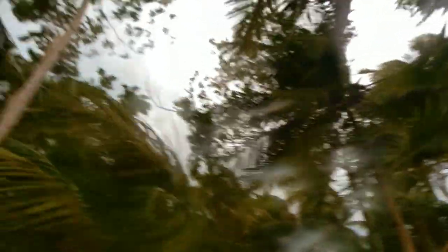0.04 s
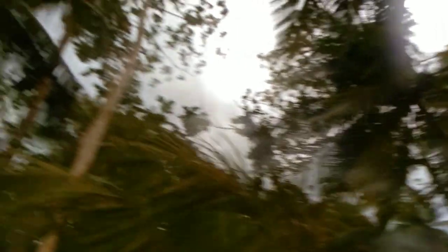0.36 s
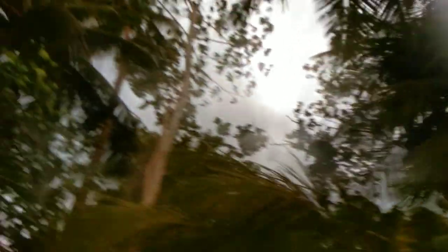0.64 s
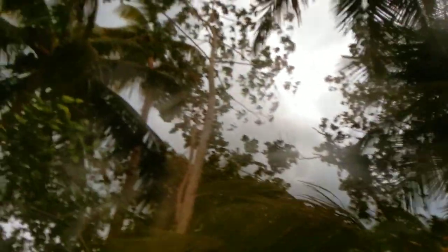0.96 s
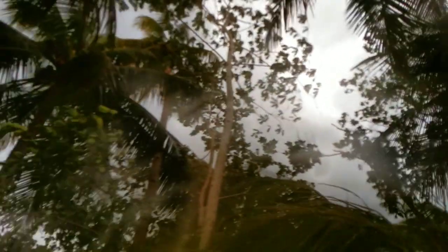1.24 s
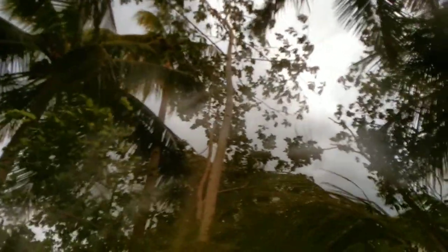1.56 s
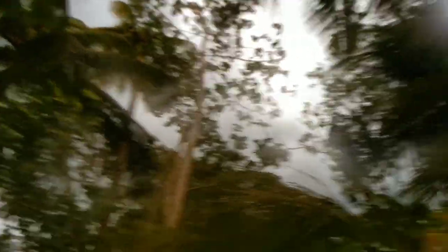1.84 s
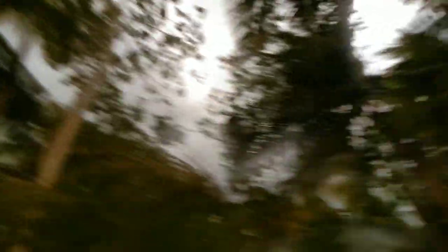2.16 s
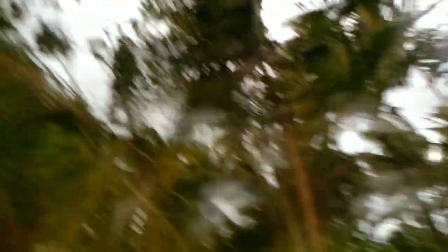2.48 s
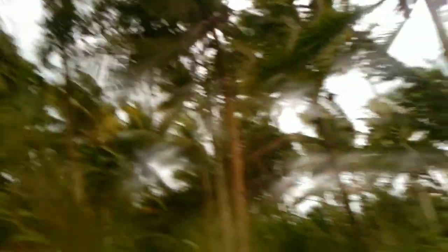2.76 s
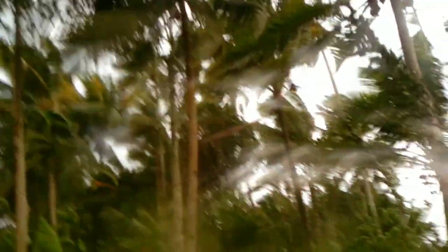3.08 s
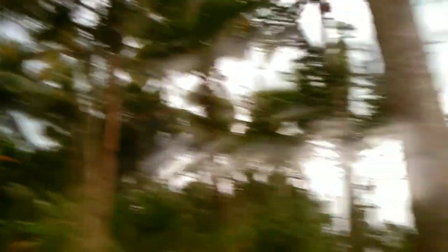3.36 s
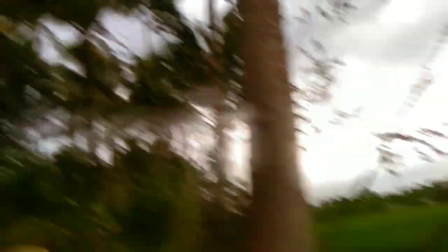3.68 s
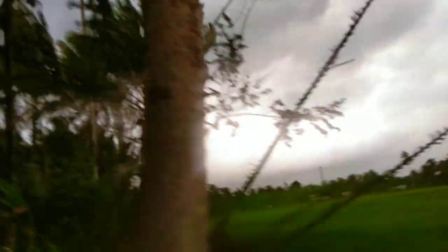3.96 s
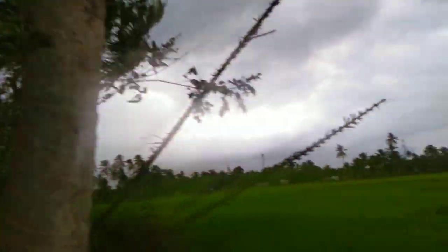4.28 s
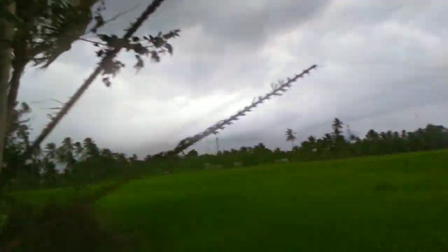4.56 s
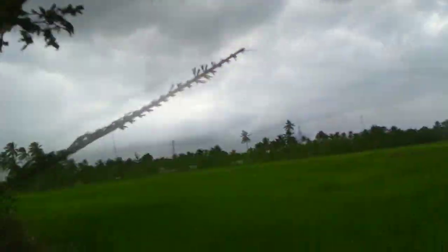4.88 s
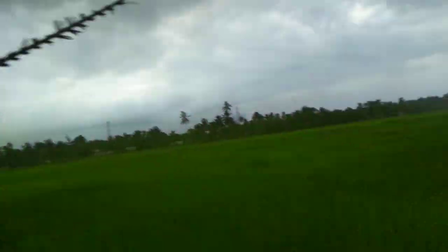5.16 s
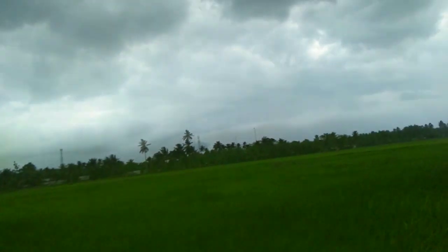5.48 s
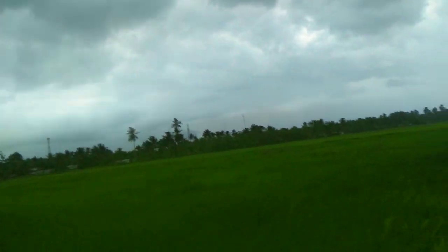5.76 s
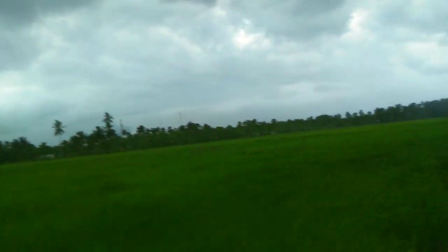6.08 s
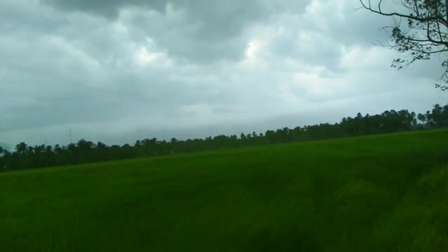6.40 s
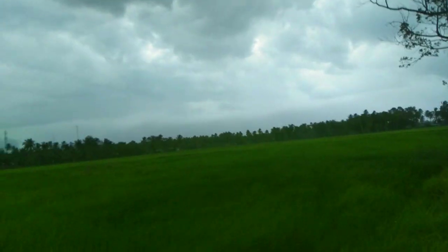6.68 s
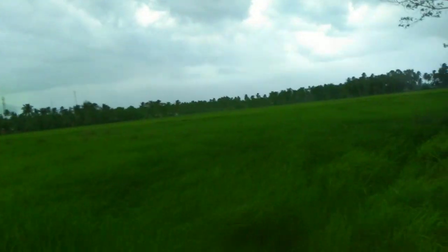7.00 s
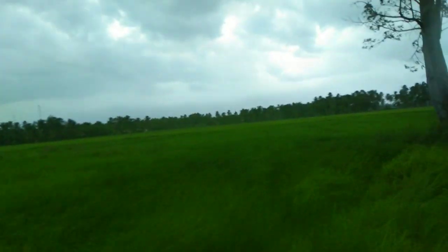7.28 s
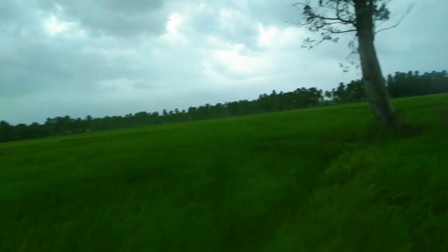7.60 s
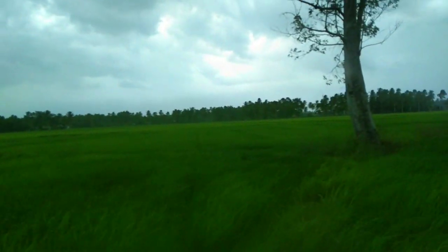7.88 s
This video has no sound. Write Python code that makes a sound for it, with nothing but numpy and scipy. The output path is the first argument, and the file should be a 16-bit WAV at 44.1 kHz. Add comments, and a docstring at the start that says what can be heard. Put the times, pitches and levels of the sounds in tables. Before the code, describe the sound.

Storm wind hits the microphone from the start with a low, lumpy rumble, over the steady hiss and fine patter of palms and trees beside an open field. The gusts are hard and uneven through the first three seconds, with dull thumps, and the leaf hiss dips slightly under the strongest ones. A dull rush swells beneath the wind around 1.5 seconds and dies away after 5. Faint cracks come at about 0.6 and 2.4 seconds, and a short, close snap, like a twig, at 4 seconds. Two thin, faint ticks sit on gusts near 3.8 and 6.3 seconds. The buffeting weakens from about 5 to 6.2 seconds, leaving mostly the leaves. Then deep gusts and thumps return, strong around 6.5 and 7.4 seconds, and continue to the end near 8 seconds as the hiss softens a little.

```python
"""A lumpy rumble of storm wind comes first, over the hiss of palms and trees beside an open field.
Turbulent gusts press on the port of a single microphone, and lone eddies thump against it.
Countless leaf impacts add up to a patter and hiss; a dull rush under the wind dies away after 5 s.
There are faint cracks, a close snap near 4 s, likely a twig, and two thin ticks at gust peaks.
In hard gusts the recorder's limiter turns everything down, so the leaves duck."""
import sys
import numpy as np
from scipy import signal
from scipy.fft import rfft, irfft, next_fast_len
from scipy.io import wavfile
from scipy.ndimage import uniform_filter1d

SR = 44100
rng = np.random.default_rng(int(sys.argv[2]) if len(sys.argv) > 2 else 0)


def digitize_waveform(pressure):
    """Quantize a signal to 16-bit integers and store it at the path in sys.argv[1].

    Rows of a 2-D input are taken as channels; values are limited to [-1, 1].
    """
    field = np.atleast_2d(pressure).T
    bounded = np.clip(field, -1, 1)
    quanta = np.round(bounded * 32767).astype(np.int16)
    wavfile.write(sys.argv[1], SR, quanta)


N = 350154

# flow at the port between gusts: (time [s], force [dB])
BREEZE_FORCE = [(0.0, -38), (1.0, -35), (2.0, -36.5), (3.0, -37.5), (3.45, -41), (4.35, -50.5), (4.9, -42),
                (5.35, -49), (5.7, -41.5), (5.84, -59), (6.08, -55), (6.18, -64), (6.4, -34), (7.02, -50),
                (7.3, -34.5), (7.94, -40.3)]
# gusts at the port: (start [s], hold [s], force [dB], extra weight in the big eddies [dB])
PORT_GUSTS = [(0.008, 0.067, -26, 1), (0.132, 0.054, -27.5, 0), (0.181, 0.26, -18, -2.3),
              (0.488, 0.091, -25, 3.7), (0.662, 0.097, -30, 4), (0.886, 0.027, -27, -0.5),
              (1.087, 0.4, -25, -5), (1.531, 0.093, -20.5, -5.5), (1.654, 0.11, -23.5, -13),
              (1.83, 0.17, -32.5, 2), (2.045, 0.18, -26, 0.3), (2.234, 0.26, -21.5, -2),
              (2.51, 0.1, -18.1, -9), (2.623, 0.36, -29.3, 8.5), (3.005, 0.33, -37.5, 6.6),
              (3.665, 0.11, -27.2, -2), (3.836, 0.0093, -22.5, -14), (3.91, 0.092, -30.5, -4),
              (4.055, 0.17, -28.5, -2.8), (4.399, 0.019, -36.5, 0.5), (4.509, 0.042, -35.0, -3),
              (4.613, 0.043, -28.5, -4.5), (4.736, 0.16, -29.5, -2.3), (4.933, 0.118, -42, 2.5),
              (5.124, 0.071, -47.3, 6), (5.196, 0.008, -38.5, 5.1), (5.552, 0.033, -29, 1.5),
              (5.893, 0.029, -43.5, 8.5), (5.972, 0.064, -45.5, 8), (6.267, 0.0094, -34, -5.9),
              (6.328, 0.12, -30.5, 4.5), (6.482, 0.12, -26.5, 5.7), (6.658, 0.018, -26.9, 5.5),
              (6.75, 0.067, -37.5, 4.5), (7.099, 0.0049, -33.5, -10), (7.242, 0.047, -31.5, -2.4),
              (7.321, 0.38, -24.5, -0.7), (7.458, 0.15, -25.5, -21), (7.729, 0.2, -25.1, -8.5)]
# spectrum of the turbulence: (frequency [Hz], relative density [dB])
RUMBLE_SPECTRUM = [(15, -50), (25, -33), (32, -30), (45, -16.5), (60, -5.5), (80, -2), (115, 0),
                   (170, -2.5), (250, -6), (400, -13), (560, -19.5), (1000, -29), (1500, -33), (2000, -59)]
# how strongly a band follows the small eddies rather than the big: (frequency [Hz], weight [ratio])
SMALL_EDDY_WEIGHT = [(105, 0.03), (150, 0.51), (210, 0.87), (300, 0.95), (430, 1.35), (1300, 0.66)]
# steep upper edge of the rumble, highest in hard gusts: (force [dB], edge frequency [Hz])
RUMBLE_EDGE = [(-64, 630), (-42, 480), (-31, 444), (-23.5, 960), (-14.5, 1680)]
# near foliage, swelling and easing slowly: (time [s], relative level [dB])
FOLIAGE_LEVEL = [(0, -30), (0.65, -31), (1.5, -33.5), (2.7, -32), (4.1, -32), (5.5, -33.7), (7, -34),
                 (7.94, -35.8)]
# spectrum of the leaf hiss: (frequency [Hz], relative density [dB])
HISS_SPECTRUM = [(1000, -38), (1500, -24.5), (2400, -13.5), (3100, -6), (3900, -0.5), (4450, 1.5),
                 (5100, -3.5), (6000, -1), (7000, 0.55), (7900, -2), (9500, -9.5), (11000, -15.5),
                 (13000, -22), (15500, -29)]
# rush of the crowns: (time [s], level relative to the foliage [dB])
CROWN_LEVEL = [(0, -13.5), (1.0, -11), (2.0, -11.5), (3.0, -13), (4.0, -14), (7.9, -11.5)]
# spectrum of that rush: (frequency [Hz], relative density [dB])
CROWN_SPECTRUM = [(600, -43), (1050, -45), (1230, -7.5), (1400, -3), (1700, 0.5), (2100, 1), (2900, 1.5),
                  (3500, 0), (4800, -24.5)]
# dull low-mid rush under the wind, dying away after about 5 s: (time [s], level [dB])
DULL_RUSH_LEVEL = [(0, -51), (1.4, -38.5), (3.2, -51), (4.7, -52.5), (5.3, -65.5), (5.8, -73), (7.0, -70),
                   (7.94, -62)]
# spectrum of the dull rush: (frequency [Hz], relative density [dB])
DULL_RUSH_SPECTRUM = [(100, -19), (300, -9), (520, 4.5), (750, -4.5), (950, -1), (1140, -7.5), (1500, -7),
                      (2500, -32)]
# single eddies that hit the port: (time [s], relative level [dB], frequency [Hz])
LONE_EDDIES = [(0.321, -8, 490), (0.434, -10, 460), (2.055, -8, 524), (2.326, -8, 597), (3.707, -12, 434),
               (3.848, -11, 265), (4.655, -16, 262), (4.753, -10, 290), (5.196, -22, 130),
               (5.579, -20, 170), (6.002, -15, 86), (6.340, -14.5, 363), (6.356, -4, 212),
               (6.487, -11.5, 390), (6.811, -7.5, 137), (7.105, -10.5, 123.5), (7.246, -15.5, 325),
               (7.351, -4, 230), (7.407, -4, 273), (7.452, -16, 600), (7.607, -10, 540)]
# faint cracks and a snap, plus thin high ticks like microphone overload at 3.835 and 6.335 s:
# (time [s], relative level [dB], 60 dB decay time [s], tilt [dB/octave])
CRACKS_AND_TICKS = [(0.6155, -21, 0.018, 0), (2.4059, -26, .014, -4), (3.835, -32, .008, 20),
                    (4.0032, -17.5, 0.019, -11), (4.0152, -5, 0.0044, -2), (4.0162, -17, 0.0031, -7.5),
                    (4.018, -23, 0.023, -16), (4.0212, -16.5, 0.0064, -5), (4.0230, -9, 0.0075, -5),
                    (4.0272, -15, 0.019, -1), (6.335, -38, .005, 20)]
# spectrum of a crack or tick before its tilt: (frequency [Hz], relative density [dB])
BURST_SPECTRUM = [(100, -75), (1200, -34), (2400, -18), (3600, -0.5), (6500, 8), (8000, 6), (10000, -33),
                  (11500, -7), (14000, -10), (15500, -15), (17000, -60)]


def from_db(db):
    """Amplitude grows tenfold for every 20 dB."""
    return 10 ** (np.asarray(db) / 20)


def unit_rms(x):
    """Dividing by the rms value gives a signal unit power."""
    return x / np.sqrt(np.mean(x ** 2) + 1e-20)


def in_time(curve):
    """Linear interpolation gives a curve a value at every sample."""
    return np.interp(np.arange(N) / SR, *np.transpose(curve))


def at_hz(points, hz):
    """Interpolation in log frequency treats all octaves alike."""
    frequencies, values = np.transpose(points)
    return np.interp(np.log(np.maximum(hz, 1)), np.log(frequencies), values)


def coloured(x, spectrum):
    """Filtering is multiplication in the frequency domain."""
    size = next_fast_len(len(x))
    hz = np.arange(size // 2 + 1) * SR / size
    return irfft(rfft(x, size) * from_db(at_hz(spectrum, hz)), size)[:len(x)]


def drift(corner_hz):
    """Low-passed noise wanders slowly, here with an rms value of 1."""
    step, settle = 40, 2000
    pole = np.exp(-2 * np.pi * corner_hz * step / SR)
    noise = rng.standard_normal(N // step + settle + 2)
    slow = signal.lfilter([1], [1, -2 * pole, pole * pole], noise)[settle:]
    return np.interp(np.arange(N) / step, np.arange(len(slow)), unit_rms(slow))


def envelope(x, span_s):
    """The root of the locally averaged power traces a signal's amplitude."""
    size = max(int(span_s * SR), 2)
    return np.sqrt(np.abs(uniform_filter1d(uniform_filter1d(x * x, size), size)) + 1e-20)


def wind_force_db(peaks_db, rise_db_per_s=750, fall_db_per_s=317):
    """Gusts add to the breeze in power; each arrives fast, holds and ebbs more slowly."""
    t = np.arange(N) / SR
    power = from_db(in_time(BREEZE_FORCE)) ** 2
    for (start, hold, *_), peak_db in zip(PORT_GUSTS, peaks_db):
        near = np.abs(t - start) < hold + .5
        early = np.maximum(start - t[near], 0)
        late = np.maximum(t[near] - start - hold, 0)
        power[near] += from_db(peak_db - rise_db_per_s * early - fall_db_per_s * late) ** 2
    return 10 * np.log10(power)


def buffeting(full_gust_db, surge_db, lump_db, burst_db, fall_db_per_octave, gain_db):
    """Turbulent pressure on the port: big eddies rumble, hard gusts add smaller, higher-pitched ones."""
    _, _, force_db, weight_db = np.transpose(PORT_GUSTS)
    swing_db = wind_force_db(force_db + weight_db) + 31.5   # about a reference force of -31.5 dB
    big_db = -21.5 + 0.73 * swing_db + surge_db * drift(16)   # big eddies follow only part of the swing
    small_db = wind_force_db(force_db) + burst_db * drift(34.6)
    size = next_fast_len(N)
    hz = np.arange(size // 2 + 1) * SR / size
    flow = rfft(unit_rms(coloured(rng.standard_normal(N), RUMBLE_SPECTRUM)), size)
    centres_hz = np.geomspace(90, 1800, 14)
    band_gains = [at_hz(np.c_[centres_hz, one_band], hz) for one_band in np.eye(len(centres_hz))]
    bands = np.array([irfft(flow * gain, size)[:N] for gain in band_gains])
    tilt_db = np.outer(at_hz(SMALL_EDDY_WEIGHT, centres_hz), small_db - big_db - full_gust_db)
    # the rumble has a steep upper edge, higher in hard gusts and lower in lulls
    edge_hz = np.interp(small_db, *np.transpose(RUMBLE_EDGE))
    octaves_over = np.maximum(np.log2(centres_hz[:, None] / edge_hz), 0)
    shaped = bands * from_db(tilt_db - fall_db_per_octave * octaves_over)
    rumble = np.zeros(N)
    for group in (centres_hz < 250, centres_hz >= 250):
        eddies = bands[group].sum(axis=0)   # each size of eddy carries a steady share of the flow
        rumble += shaped[group].sum(axis=0) * eddies.std() / envelope(eddies, span_s=0.044)
    return rumble * from_db(big_db + gain_db + lump_db * drift(27.6))


def foliage(taps_per_s, spread_db, taps_db, flutter_db, hiss_db):
    """Random impacts make shot noise: near leaves tap, far ones merge into a fluttering hiss and rush."""
    leaf_db = in_time(FOLIAGE_LEVEL)
    touches = rng.random(N) < taps_per_s * from_db(leaf_db - leaf_db.mean()) / SR
    signs = rng.choice([-1, 1], N)
    strengths = from_db(spread_db * np.minimum(rng.exponential(1, N), 4))
    taps = from_db(taps_db) * unit_rms(touches * signs * strengths)
    hiss = from_db(hiss_db) * unit_rms(coloured(rng.standard_normal(N) + taps, HISS_SPECTRUM))
    rush = from_db(in_time(CROWN_LEVEL)) * unit_rms(coloured(rng.standard_normal(N), CROWN_SPECTRUM))
    return from_db(leaf_db + flutter_db * drift(25)) * (hiss + rush)


def dull_rush():
    """Band-limited noise under a slow envelope: a low-mid rush that swells, then dies away."""
    noise = unit_rms(coloured(rng.standard_normal(N), DULL_RUSH_SPECTRUM))
    return from_db(in_time(DULL_RUSH_LEVEL)) * noise


def eddy_thumps(width_cycles, gain_db):
    """A lone eddy is a pressure pulse that pushes and pulls on the port for a cycle or two."""
    t, out = np.arange(N) / SR, np.zeros(N)
    for (time_s, level_db, hz), phase in zip(LONE_EDDIES, rng.random(len(LONE_EDDIES))):
        near = np.abs(t - time_s) < 4 * width_cycles / hz
        cycles = (t[near] - time_s) * hz
        pulse = from_db(level_db + gain_db) * np.exp(-(cycles / width_cycles) ** 2)
        out[near] += pulse * np.sin(2 * np.pi * (cycles + phase))
    return out


def cracks_and_ticks(gain_db):
    """Brief transients are broadband: dry fibres crack and snap; a steep upward tilt gives thin ticks."""
    t, out = np.arange(SR // 20) / SR, np.zeros(N)
    noises = rng.choice([-1, 1], (len(CRACKS_AND_TICKS), len(t)))
    for (time_s, level_db, t60, tilt), noise in zip(CRACKS_AND_TICKS, noises):
        decay = from_db(-60 * t / t60)
        spectrum = [(hz, db + tilt * np.log2(hz)) for hz, db in BURST_SPECTRUM]
        burst = coloured(np.pad(noise * decay, len(t)), spectrum)
        burst *= np.linalg.norm(decay) / np.linalg.norm(burst)   # same energy whatever the colour
        start = round(time_s * SR) - len(t)
        out[start:start + len(burst)] += from_db(level_db + gain_db) * burst
    return out


def scene():
    """Pressures superpose at one microphone; saturation at its port rounds off the hardest pushes."""
    air = buffeting(full_gust_db=-5.0, surge_db=2.1, lump_db=1.47, burst_db=2.0,
                    fall_db_per_octave=20.0, gain_db=2.34)
    air += eddy_thumps(width_cycles=0.66, gain_db=-0.5)
    ceiling = from_db(0.5)
    leaves = foliage(taps_per_s=2500, spread_db=1.5, taps_db=-6.5, flutter_db=0.79, hiss_db=-0.56)
    mono = ceiling * np.tanh(air / ceiling) + leaves + dull_rush() + cracks_and_ticks(gain_db=-1.0)
    return np.array([mono, mono])


def limiter_gain(x, threshold_db, sense_s, attack_s, release_db_per_s):
    """Look-ahead limiting: the gain eases down just before an overshoot, then recovers."""
    over_db = np.maximum(20 * np.log10(envelope(x, sense_s)) - threshold_db, 0)
    recovery_db = release_db_per_s * np.arange(N) / SR
    held_db = np.maximum.accumulate(over_db + recovery_db) - recovery_db
    size = max(int(attack_s * SR), 1)
    return from_db(-uniform_filter1d(uniform_filter1d(held_db, size), size))


def record(dry):
    """One limiter gain acts on the whole mix, and a steep low-pass filter removes the highest treble."""
    gain = limiter_gain(dry[0], threshold_db=-14.5, sense_s=0.0019, attack_s=0.013, release_db_per_s=262)
    low_pass = signal.ellip(12, .1, 80, 15550, fs=SR, output="sos")   # cutoff at 15550 Hz
    return signal.sosfilt(low_pass, dry * gain)


dry = scene()
out = record(dry)
digitize_waveform(out)
```